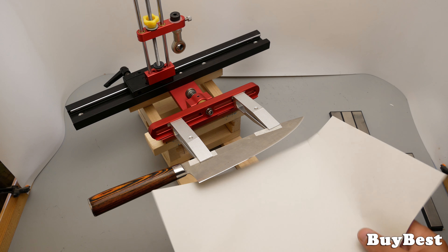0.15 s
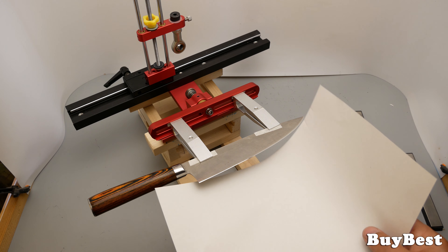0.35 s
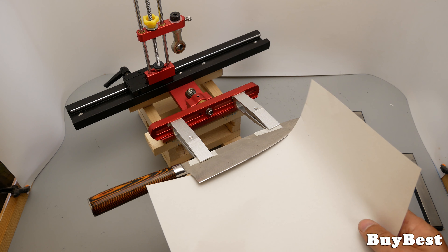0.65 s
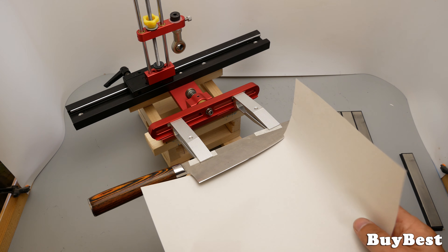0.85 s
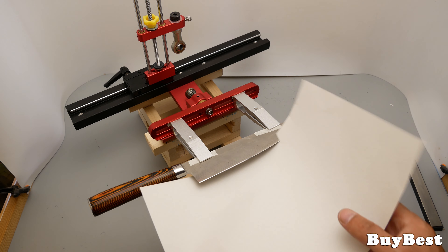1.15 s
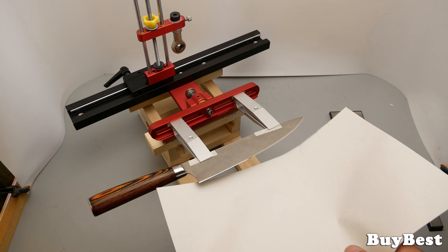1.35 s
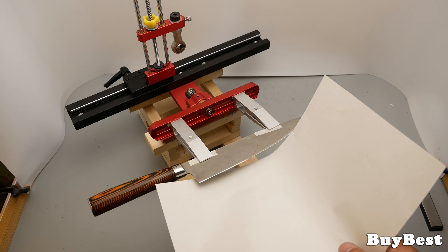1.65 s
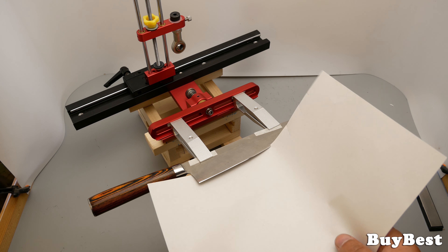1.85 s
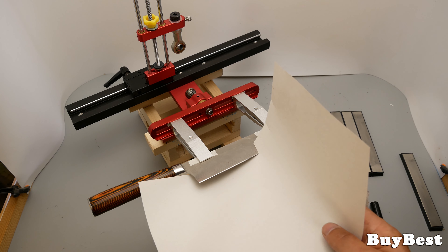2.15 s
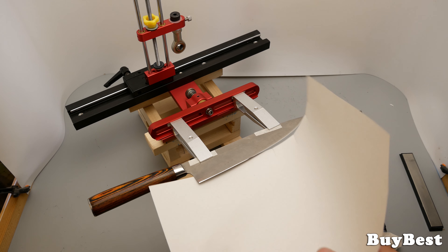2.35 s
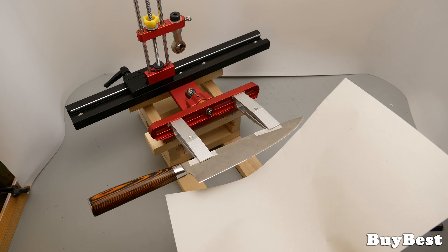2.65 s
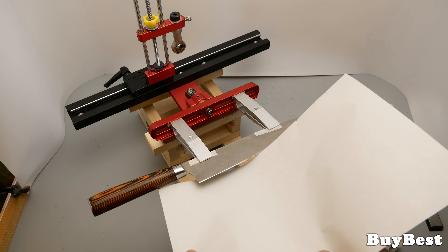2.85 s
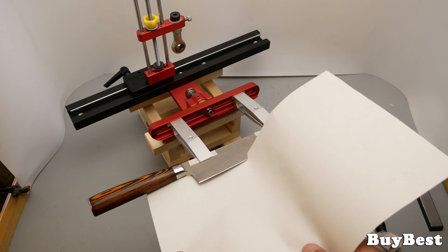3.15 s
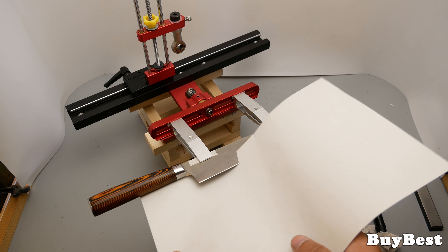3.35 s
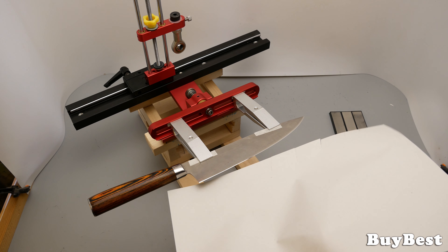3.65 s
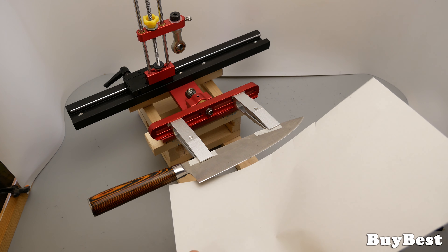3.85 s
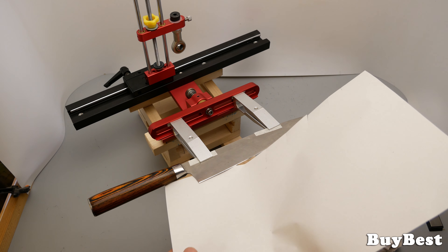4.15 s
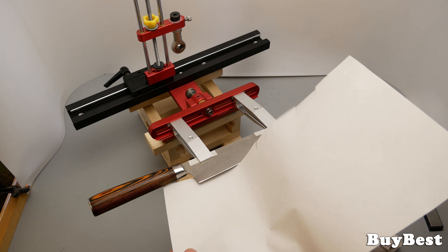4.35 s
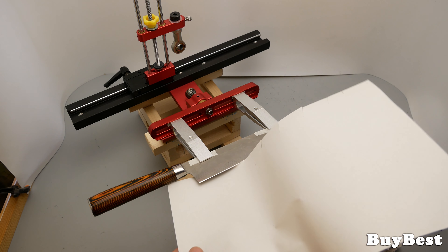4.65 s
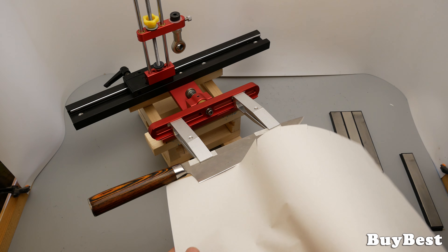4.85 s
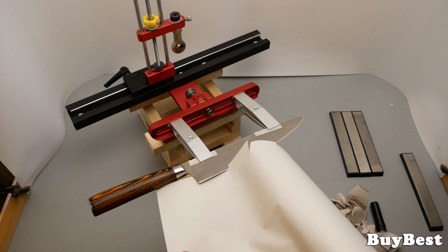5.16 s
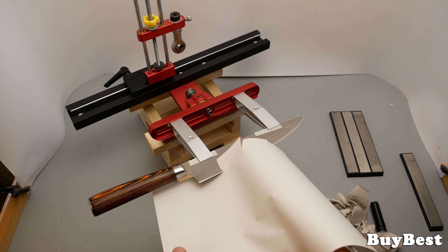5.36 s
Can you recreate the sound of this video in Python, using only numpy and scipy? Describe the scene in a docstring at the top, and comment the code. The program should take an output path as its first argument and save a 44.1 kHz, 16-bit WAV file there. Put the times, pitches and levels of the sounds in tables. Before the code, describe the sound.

Dry, grainy strokes of paper over steel, each about half a second or less, swelling and stopping quickly. Between them the loose sheet rustles, flaps softly with a low hum and snaps at its creases, with hard cracks around 4.4 and 5 seconds. Recorded close in stereo in a small, nearly dry space over a very faint, steady room tone.

```python
"""A hand drags a large sheet of paper again and again along the edge of a clamped kitchen knife in a small booth.
Scrape: random fibre ticks through the colour of the sheet, with two broad rings while it touches the edge.
Between pulls the sheet rustles and its creases snap: decaying grainy noise, with a sharp crack or a soft swell.
Behind it: a low hum as the sheet fans the air, sparse booth reflections and faint two-port room tone."""
import sys
import numpy as np
from scipy import signal
from scipy.fft import rfft, irfft, next_fast_len
from scipy.io import wavfile
from scipy.ndimage import uniform_filter1d

SR = 44100
rng = np.random.default_rng(int(sys.argv[2]) if len(sys.argv) > 2 else 0)


def bounce(signal):
    """Save signal as a 16-bit WAV file at the path given by the first command-line argument."""
    frames = np.transpose(np.atleast_2d(signal))
    limited = np.clip(frames, -1, 1)
    pcm = np.round(limited * 32767).astype(np.int16)
    wavfile.write(sys.argv[1], SR, pcm)


N = 243431
LEAD_IN = 256  # samples ahead of each band response, room for its pre-ringing


def gain_of(db):
    """Amplitude factor of a level in dB."""
    return 10 ** (np.asarray(db) / 20)


def evened(x):
    """Scales to RMS 1."""
    return x / np.sqrt(np.mean(x ** 2) + 1e-20)


def read(points, hz):
    """Interpolates a (f/Hz, value) curve over log frequency."""
    f, value = np.transpose(points)
    return np.interp(np.log(hz + 1), np.log(f + 1), value)


def add(mix, s, sound):
    """Adds a sound into the mix from s seconds on, cut at the end."""
    part = mix[round(s * SR):][:len(sound)]
    part += sound[:len(part)]


def causal(gain):
    """Minimum-phase impulse response of this gain shape, energy 1."""
    log = np.log(np.maximum(np.r_[gain, gain[-2:0:-1]], 1e-5))
    taps = np.fft.ifft(np.exp(np.conj(signal.hilbert(log)))).real[:4096]
    return taps / np.linalg.norm(taps)


def resonate(x, hz, width):
    """Resonance of peak gain 1 on a fixed or moving hz: shift down to zero, smooth, shift back."""
    turn = np.exp(2j * np.pi * np.cumsum(hz * np.ones(len(x))) / SR)
    r = np.exp(-np.pi * width / SR)
    return 2 * (turn * signal.lfilter([1 - r], [1, -r], x / turn)).real


def room_tone():
    """Faint steady noise, slightly patchy in time and frequency, only partly alike in the two ports."""
    # spectrum shape: f/Hz, relative density/dB
    air = [(15, -59), (25, -24), (65, -34), (107, 4), (276, 5), (659, 0), (771, -3), (835, 0), (2460, -23),
           (5020, -23.5), (7660, -24), (10500, -70.5), (13700, -99)]
    # left-right correlation: f/Hz, likeness (clipped to -1..1)
    air_same = [(60, 0.4), (180, -0.27), (520, 0.1), (1530, -1), (4500, 0.7), (13200, 1.5)]
    level_db, patch_db = -51.5, 1.8
    frames, hz = N // 256 + 5, np.fft.rfftfreq(1024, 1 / SR)
    a, b, c, d, patches = rng.standard_normal((frames, 513, 5)).T
    patches = uniform_filter1d(patches, size=10, axis=0)
    patches = evened(uniform_filter1d(patches, size=10, axis=1))
    same = np.clip(read(air_same, hz), -1, 1)[:, None]
    left = a + 1j * b
    right = same * left + np.sqrt(1 - same ** 2) * (c + 1j * d)
    z = np.array([left, right]) * gain_of(read(air, hz)[:, None] + patch_db * patches)
    noise = signal.istft(z, nperseg=1024, noverlap=768)[1][:, :N]
    return gain_of(level_db) * evened(noise)


def booth(x):
    """Sparse reflections of random sign, other ones for each port; each band dies at its own speed."""
    # decay: f/Hz, t60/s
    walls = [(150, 0.24), (700, 0.3), (2000, 0.018), (8000, 0.047)]
    # reflections against the dry sheet: f/Hz, level/dB
    wet = [(150, -8), (700, -16), (2100, -7), (4000, -9), (8000, -10.5), (12000, -10.5)]
    taps = np.zeros((2, 16000))
    at = np.arange(100, 15980, 20) + rng.integers(0, 20, (2, 794))  # one per 20 samples
    np.put_along_axis(taps, at, rng.choice([-1., 1.], at.shape), 1)
    hz, t, z = signal.stft(taps, SR, nperseg=256)
    z = z * gain_of(-60 * t / read(walls, hz)[:, None])
    # band energies set against those of a unit impulse
    impulse = signal.stft(signal.unit_impulse(999, 500), nperseg=256)[2]
    z *= (gain_of(read(wet, hz)) / np.linalg.norm(z, axis=2).clip(1e-9))[..., None]
    z *= np.linalg.norm(impulse, axis=1)[:, None]
    reflections = signal.istft(z, SR, nperseg=256)[1]
    return signal.fftconvolve(x[None], reflections, axes=1)[:, :N]


def ports(x):
    """The direct sound reaches the two microphone ports with a small tilt of level and phase."""
    # level difference: f/Hz, left minus right/dB
    lean = [(60, 3), (110, 2), (200, 3), (360, 1), (660, -1), (1200, -2.5), (2190, -6), (3990, 0),
            (7260, 0), (13200, -0.4)]
    # phase difference: f/Hz, lead of the left port/rad
    lead = [(0, -0.04), (500, -0.5), (800, -0.6), (1900, -0.6), (2700, 0.5), (3400, 0.2), (5000, 0.2),
            (13000, 0)]
    size = next_fast_len(N)
    hz = np.fft.rfftfreq(size, 1 / SR)
    half = gain_of(read(lean, hz) / 2) * np.exp(.5j * read(lead, hz))
    return irfft(rfft(x, size) * np.array([half, 1 / half]), size)[:, :N]


def hums():
    """The sheet fans the air and the lowest booth mode hums: narrow noise that swells and fades."""
    # pushes of air: t of the peak/s, level/dB, length between the 1/e points/s
    pushes = [(1.07, -57.5, 0.15), (1.46, -58.5, 0.27), (2.052, -55, 0.15), (3.375, -62.5, 0.23),
              (4.446, -55, 0.17), (5.03, -47.5, 0.082), (5.25, -57, 0.13)]
    hum_hz, width_hz = 134, 5.3
    t = np.arange(N) / SR
    swell = sum(gain_of(db) * np.exp(-(2 * (t - s) / length) ** 2) for s, db, length in pushes)
    return swell * evened(resonate(rng.standard_normal(N), hum_hz, width_hz))


def paper_colours():
    """The response of the sheet in its booth, split into boom, rustle, scrape, rasp and hiss, each of energy 1."""
    # spectrum shape of the sheet: f/Hz, relative density/dB
    paper = [(82, -35.5), (140, -27), (218, -19.5), (279, -3.5), (319, -7.5), (637, 0), (701, -8), (757, 1),
             (1370, 10.5), (2680, 0.5), (4770, -12.5), (8000, -30.5), (9880, -27.5), (11700, -35.5),
             (13700, -70)]
    # modes of booth, jig and blade: f/Hz, width/Hz, level/dB
    mode_list = [(203.6, 6.1, 23), (267.4, 15, 7), (467, 57, 3), (575, 6.6, 3), (648, 6.3, 8),
                 (1056, 24, 6), (1250, 6.8, 5.5), (1448, 2.7, -11.5), (1640, 7.1, -46), (2574, 28, -20),
                 (3030, 8.1, -11), (3560, 2.8, -9), (4070, 6.7, -40)]
    # band edges: f/Hz
    split_hz = [800, 1700, 3400, 6500]
    hz = np.fft.rfftfreq(8192, 1 / SR)
    modes = 1 + sum(gain_of(db) / np.hypot(1, 2 * (hz - f) / width) for f, width, db in mode_list)
    response = causal(gain_of(read(paper, hz)) * modes)
    whole = rfft(np.r_[np.zeros(LEAD_IN), response], 8192)
    # zero-phase splits: the bands share the phase of the whole
    below = [0 * hz] + [1 / (1 + (hz / edge) ** 8) for edge in split_hz] + [1 + 0 * hz]
    parts = irfft(whole * np.diff(below, axis=0))[:, :4096]
    return parts / np.linalg.norm(parts, axis=1, keepdims=True)


def ticks(shape, per_s, spread_db, smooth):
    """Fibres let go one by one, a few much harder than the rest, over a fine even friction; RMS 1."""
    chance, hard = rng.random(shape), rng.exponential(1, shape)
    sign, fine = rng.standard_normal((2, *shape))
    slips = gain_of(spread_db * np.minimum(hard, 6)) * np.sign(sign) * (chance < per_s / SR)
    return evened(evened(slips) + smooth * fine)


def snaps(colours, length=6000):
    """Creases snap or the sheet swells softly, then a grainy rattle of the sheet dies away."""
    # creases snapping, sheet catching the blade: t/s, level/dB, then against it boom/dB, rustle/dB, treble/dB; t60/s
    cracks = [(0.191, -44, -3, -1, -7.5, 0.1), (0.267, -39.5, -1.5, -6, -25, 0.084),
              (0.2945, -40.5, -2.5, -6, -22, 0.14), (0.3313, -30, -11, -17, -15, 0.066),
              (0.3499, -28, -12, -11, -12.5, .1), (0.392, -43.5, -6, -5, -11, 0.092),
              (0.4755, -47.5, -1, -8, -27, 0.097), (0.744, -52, 1, -21, -16, 0.044),
              (0.813, -37, -12, -11, -14, .1), (1.451, -35.5, 0, -1.5, -13, 0.054),
              (2.0137, -30.5, -16, -27, -5, 0.026), (2.3245, -43, -2.5, -6, -4.5, 0.14),
              (2.65, -41.5, -0.5, -1, -19, 0.2), (2.816, -62.5, 8, 5, -6, 0.11),
              (3.1345, -51.5, -11, 13, 13, 0.043), (3.7908, -59.5, 12, 6, 2.5, 0.31),
              (4.0103, -58, -13, -17, 0, 0.11), (4.351, -37.5, -1.5, -18, -1, 0.1),
              (4.3857, -21, -3, -12.5, -5, 0.084), (4.6037, -42, -3.5, -2, -5.5, 0.055),
              (4.665, -51, 0, -3, -0.5, 0.088), (4.716, -59, 13.5, 4, -14, 0.1),
              (4.7702, -39.5, -4, -20, -9, 0.074), (4.8337, -34, -6, -12, -16.5, 0.063),
              (4.9693, -22.5, 0, -11, -4.5, 0.055), (5.121, -40, -13, -12, -8, .06),
              (5.1881, -34, -4, -18, -1, .06), (5.2198, -31, -3, -16, -6, 0.035)]
    # soft rustles without a crack, same columns
    swells = [(0.065, -47, 7, 4, -14, 0.16), (0.165, -52, 6.5, -1, -7, 0.42),
              (1.367, -45, 4, -2, -20, 0.18), (1.395, -38.5, 0, -2, -25, 0.29),
              (1.472, -44, 2, -4, -9, 0.17), (1.622, -50.5, -7, -8, -10, 0.17),
              (1.7, -52.5, -11, -10, 1, 0.086), (1.841, -51.5, -6, -14, -1.5, 0.56),
              (1.894, -30, -4, -5, -10, 0.071), (2.45, -38, -3.5, -13, -13, 0.13),
              (2.487, -47.5, 3, -2, -23, 0.17), (2.564, -35, -1, -5, -15, 0.083),
              (2.575, -30.5, 6, 1.5, 0.5, 0.09), (2.618, -37.5, -1, -6, -11, 0.13),
              (2.85, -56, -4, -3, -3, 0.093), (2.93, -58, -11, -10, 0, 0.095),
              (2.972, -52, 3, -10, -1, 0.15), (3.018, -38.5, -1, 4, -6, .08),
              (3.046, -27.5, -12, -8, -17, 0.063), (3.574, -51, 4, -2, -10, .1),
              (3.64, -43.5, 3, -4, -12, 0.15), (3.84, -52.5, 0, -5, -5, 0.13),
              (4.164, -47, 9.5, -6, -2.5, 0.16), (4.274, -47, 7.5, -34, -21.5, .18),
              (4.46, -35, -6, -10, 1, 0.15), (4.671, -52.5, 13.5, -7, 4.5, 0.13),
              (4.952, -34.5, -14, -10, -14, .05)]
    crack_db, head_db, head_s = 15.5, 0.5, 0.0015  # first sample and loud head, over the rattle
    swell_s = 0.0054
    hiss_db, hiss_share = -12.5, 1.21  # hiss follows the treble
    out, t = np.zeros(N), np.arange(length) / SR
    events, n = cracks + swells, len(cracks)
    rattles = ticks((len(events), length), per_s=4000, spread_db=1.5, smooth=0.54)
    rattles[:n] *= gain_of(head_db * np.exp(-t / head_s))
    rattles[:n, 0] = gain_of(crack_db)
    rattles[n:] *= 1 - np.exp(-(t / swell_s) ** 2)
    for (s, level_db, boom, rustle, treble, t60), rattle in zip(events, rattles):
        drive = gain_of(-60 * t / max(t60, .01)) * rattle
        colour_db = boom, rustle, 0, treble, hiss_db + hiss_share * treble
        sound = sum(gain_of(level_db + db) * signal.oaconvolve(drive, c) for db, c in zip(colour_db, colours))
        add(out, s - LEAD_IN / SR, sound)
    return out


def pull_gains(t):
    """Levels of the five layers while the sheet touches the edge, and where its rings sit."""
    # pulls along the edge, one curve each: t/s, scrape/dB, treble against scrape/dB, boom/dB
    strokes = [
        [(0.75, -45, -12, -58), (0.758, -49, -5, -50), (0.882, -41.5, -6, -50), (0.922, -38, -1, -40),
         (1.024, -26.5, -4.5, -43), (1.09, -30.5, -3, -44.5), (1.122, -29, -6.5, -46), (1.14, -28, -6.5, -56),
         (1.26, -72.5, -8, -67), (1.29, -66, -6, -82)],
        [(1.905, -37.5, -4.5, -41.5), (1.969, -41, -1, -47), (2.021, -37, -3, -48.5), (2.059, -38, -2, -46),
         (2.131, -25.5, -6, -42), (2.217, -26.5, -3.5, -45.5), (2.255, -32.5, -5.5, -46),
         (2.291, -51.5, 0, -69), (2.311, -68, 6, -71), (2.32, -57, -6, -67)],
        [(3.03, -48.5, 4.5, -52), (3.058, -47.5, -1, -41.5), (3.11, -48, 0, -47), (3.212, -30, -4.5, -43.5),
         (3.31, -30.5, 2.5, -41), (3.328, -28, -1, -42), (3.398, -30.5, -3.5, -48.5), (3.412, -50, 8, -48),
         (3.458, -63, 3, -88), (3.47, -59, 2, -53)],
        [(4.99, -41, -5, -46), (5.012, -35.5, -9, -43.5), (5.172, -39.5, -9.5, -45.5), (5.23, -32, -7.5, -36),
         (5.38, -25, -5, -37.5), (5.396, -25, -6, -47), (5.424, -23.5, -7, -36.5), (5.462, -26, -7.5, -41),
         (5.472, -34, -7, -35), (5.52, -56, 1, -66)],
    ]
    # end of an earlier pull, and a short pull, same columns
    more_pulls = [
        [(0.0, -46.5, 1, -55), (0.012, -52.5, 1, -53), (0.038, -62, -1, -80), (0.06, -68, 1, -59)],
        [(4.41, -40.5, 1, -32.5), (4.506, -45, -3, -45.5), (4.556, -77, 4, -55), (4.58, -66, -18, -64)],
    ]
    # free span per curve, in that order: lower ring/Hz, upper ring/Hz, upper ring level/dB, rustle/dB, hiss/dB
    spans = [(2250, 5150, 3, -6.5, -9.5), (2470, 4600, -6, -5, -10.5), (2640, 3670, -3, -4, -12),
             (2410, 4550, 0.5, -7.5, -11.5), (2260, 4000, 3, -1.5, -10), (2340, 2700, -11, -7, -17)]
    touch_s = .01  # the sheet meets and leaves the edge
    rustle_share = 0.59  # rustle lies between boom and scrape
    full_db, hiss_follows = -31.5, 0.83  # hiss follows the rasp in part, about full_db
    gains, rings = np.zeros((5, N)), []
    for curve, (*ring, rustle_db, hiss_db) in zip(strokes + more_pulls, spans):
        s, scrape, treble, boom = np.transpose(curve)
        rasp = scrape + treble
        rustle = rustle_db + boom + rustle_share * (scrape - boom)
        hiss = hiss_db + full_db + hiss_follows * (rasp - full_db)
        touch = np.clip(np.minimum(t - s[0], s[-1] - t) / touch_s + 1, 0, 1)
        gains += touch * gain_of([np.interp(t, s, db) for db in (boom, rustle, scrape, rasp, hiss)])
        rings += [(s[0], *ring), (s[-1], *ring)]
    return gains, np.transpose(sorted(rings))


def rubbing(colours, lower_db=9.5):
    """Fibres slip over the steel as dense ticks; two broad rings sound while the sheet is bent over the edge."""
    # loose sheet shifting in the hand between pulls: t/s, level/dB
    handling = [(0.1, -51.5), (0.23, -46.5), (0.36, -43.5), (0.54, -53), (0.74, -52.5), (1.3, -49),
                (1.55, -49.5), (1.88, -53), (2.35, -44.5), (2.52, -47), (2.69, -49), (2.8, -56.5),
                (3.0, -50.5), (3.5, -44), (3.86, -52.5), (4.12, -50), (4.35, -45.5), (4.6, -51),
                (4.95, -50.5)]
    # loose sheet against that level: boom, rustle, scrape, rasp, hiss/dB
    loose_db = [-8.5, -17.5, -14, -17.5, -26.5]
    tears_per_s, tears_db = 120, -9  # bundles of fibres that give way at once
    t = np.arange(N) / SR
    gains, (s, lower_hz, upper_hz, upper_db) = pull_gains(t)
    drive = ticks((N,), per_s=5000, spread_db=3.0, smooth=0.87)
    drive += gain_of(tears_db) * ticks((N,), per_s=tears_per_s, spread_db=2.5, smooth=0.0)
    loose = [signal.oaconvolve(drive, c)[LEAD_IN:][:N] for c in colours]
    boom, rustle, scrape, rasp, hiss = loose
    lower_ring = resonate(scrape + rasp, np.interp(t, s, lower_hz), 650)
    upper_ring = resonate(rasp, np.interp(t, s, upper_hz), 1000)
    scrape = scrape + gain_of(lower_db) * lower_ring
    rasp = rasp + gain_of(np.interp(t, s, upper_db)) * upper_ring
    pulled = sum(gain * evened(part) for gain, part in zip(gains, (boom, rustle, scrape, rasp, hiss)))
    handled = gain_of(np.interp(t, *np.transpose(handling))) * (gain_of(loose_db) @ loose)
    return pulled + handled


def scene():
    """Sheet sounds, direct and reflected, over the room tone."""
    colours = paper_colours()
    sheet = rubbing(colours) + snaps(colours) + hums()
    return ports(sheet) + booth(sheet) + room_tone()


def record(dry):
    """The band limit of the recorder: a linear-phase low-pass."""
    edge_hz = 13800
    taps = signal.firwin(511, edge_hz, window=("kaiser", 9), fs=SR)
    return signal.oaconvolve(dry, taps[None], "same")


dry = scene()
out = record(dry)
bounce(out)
```